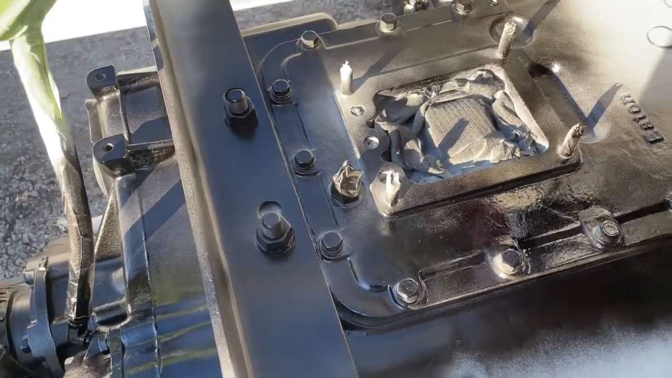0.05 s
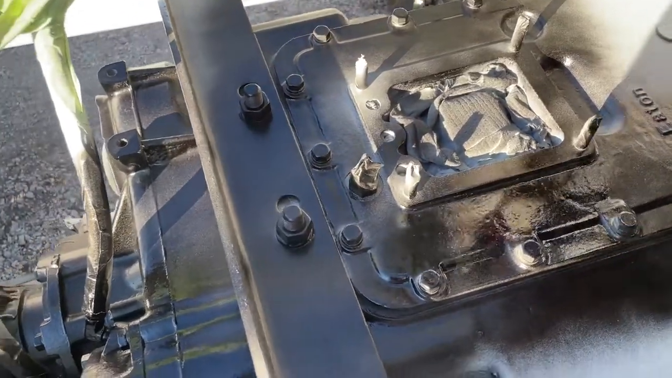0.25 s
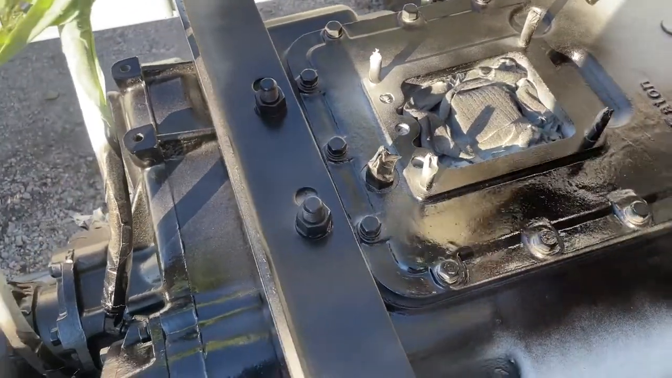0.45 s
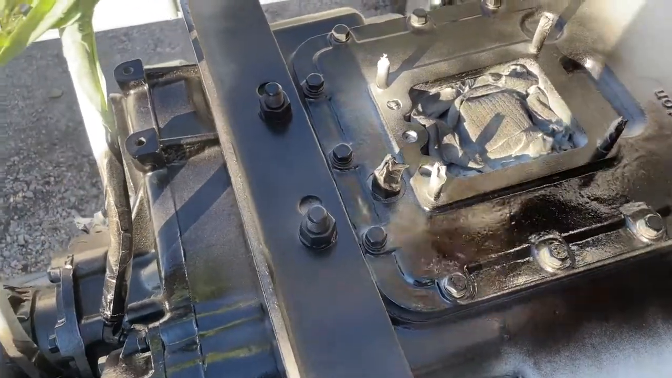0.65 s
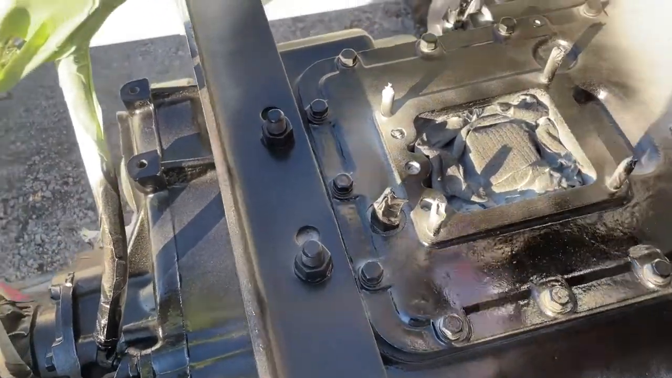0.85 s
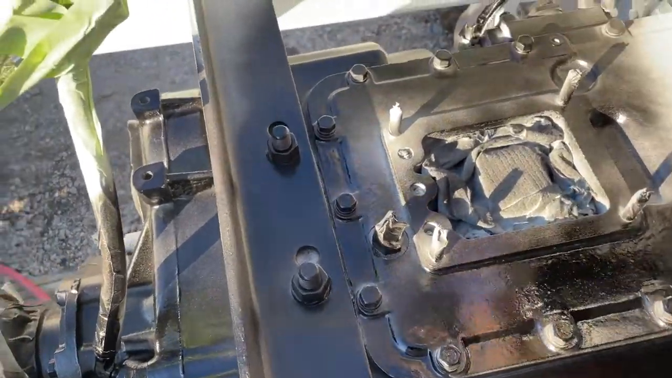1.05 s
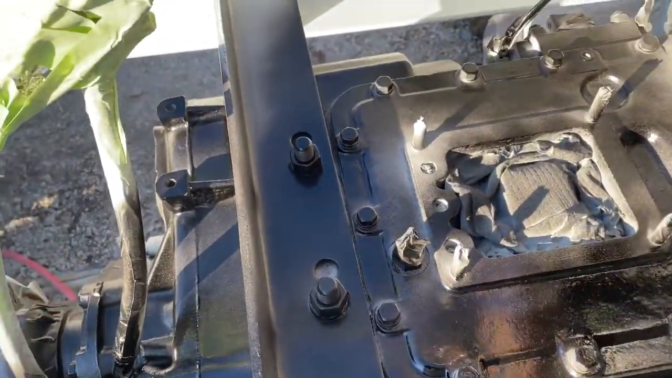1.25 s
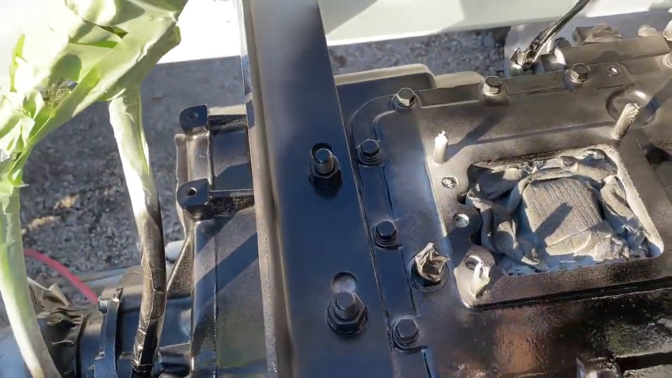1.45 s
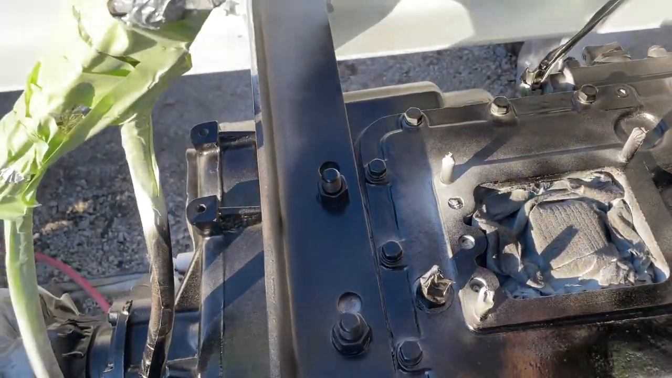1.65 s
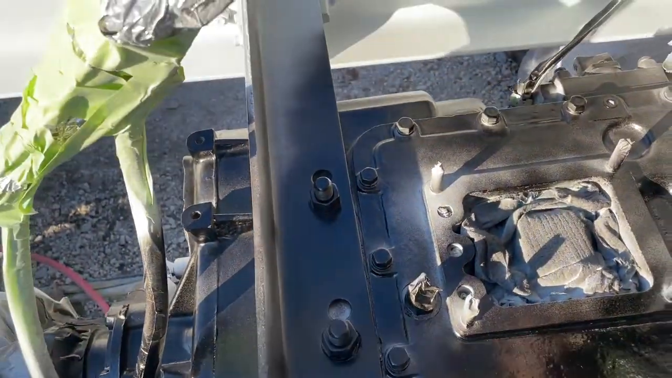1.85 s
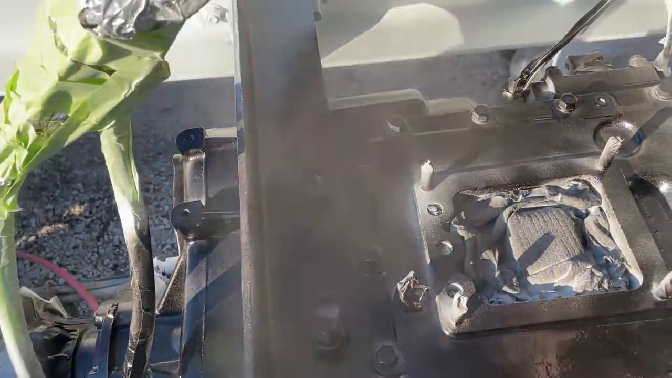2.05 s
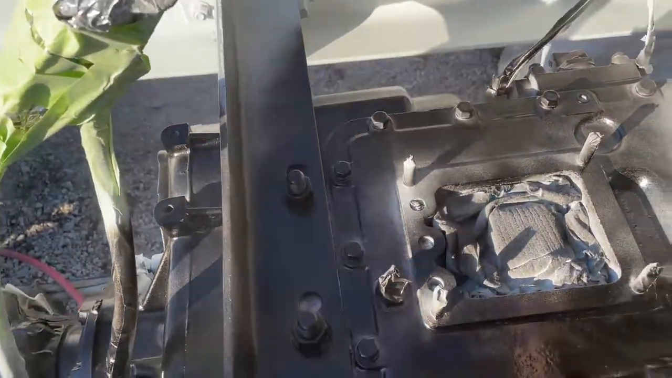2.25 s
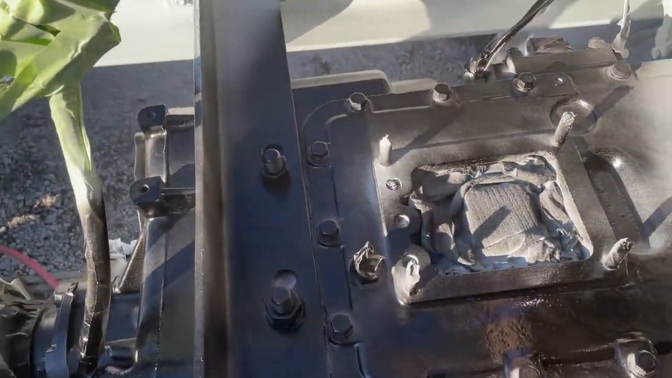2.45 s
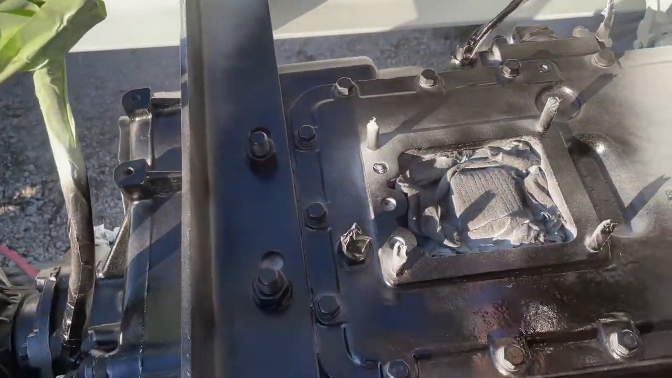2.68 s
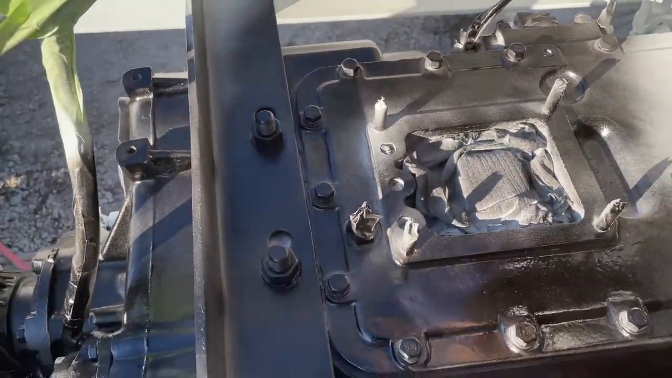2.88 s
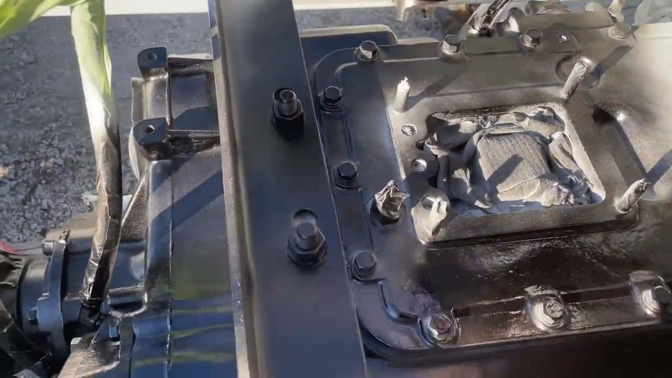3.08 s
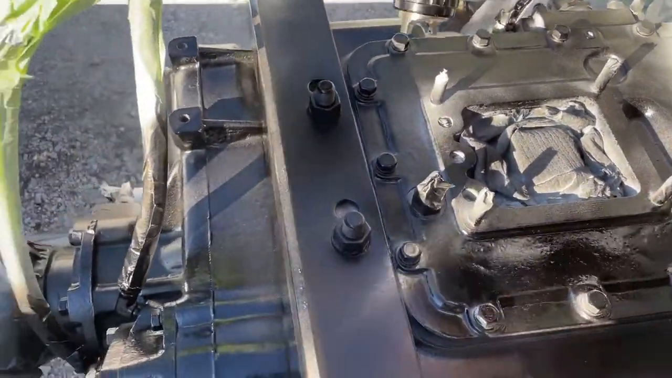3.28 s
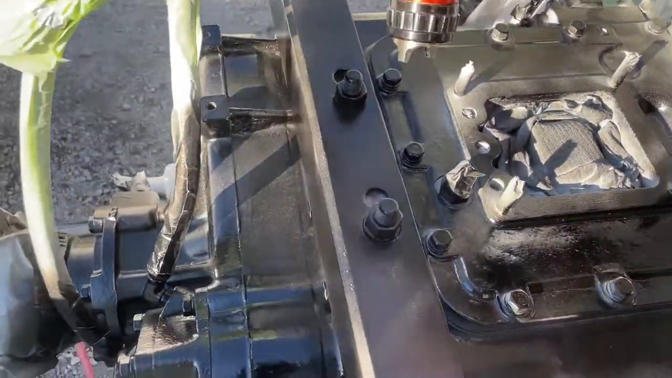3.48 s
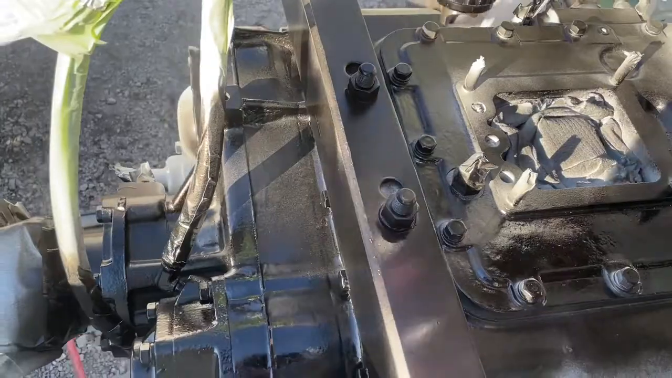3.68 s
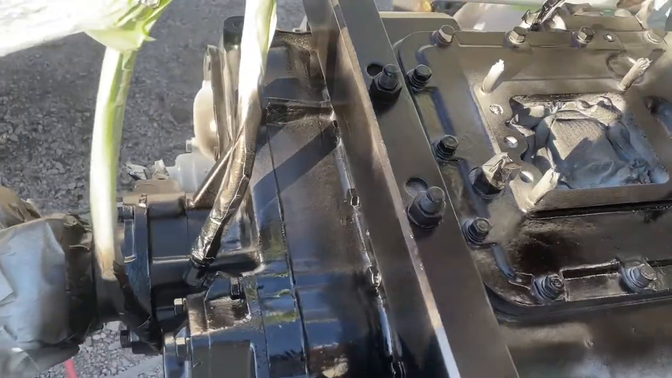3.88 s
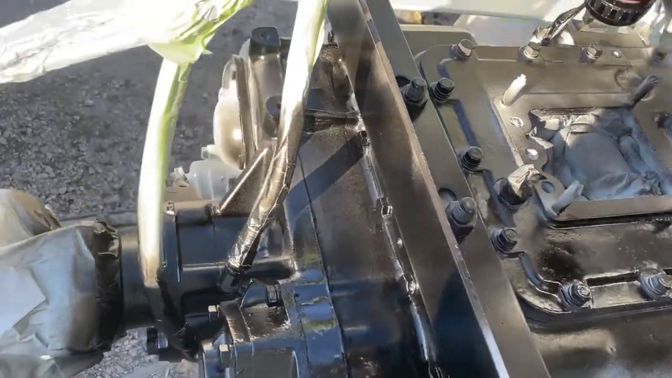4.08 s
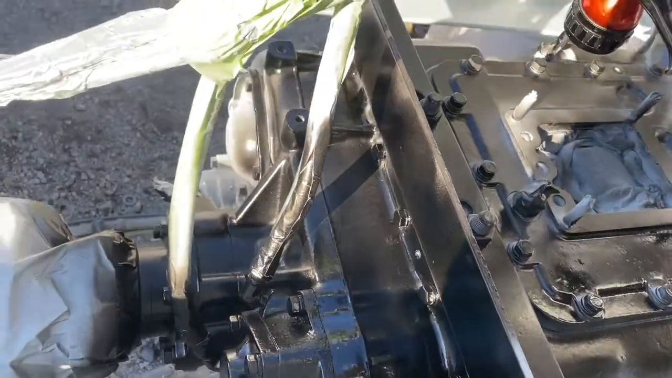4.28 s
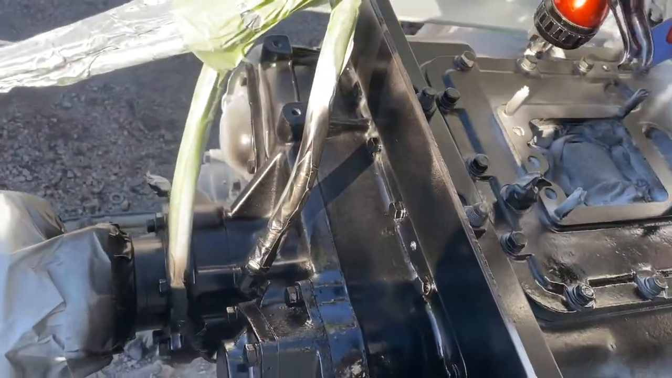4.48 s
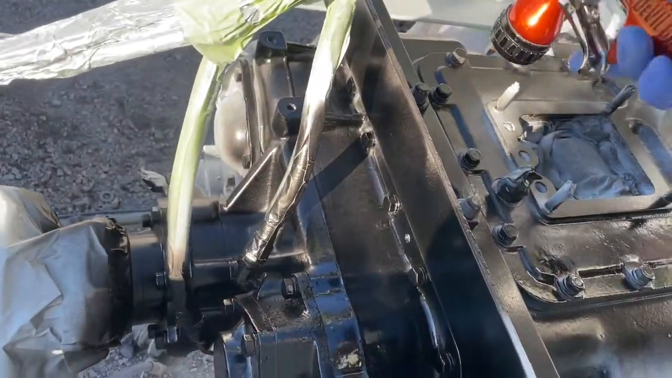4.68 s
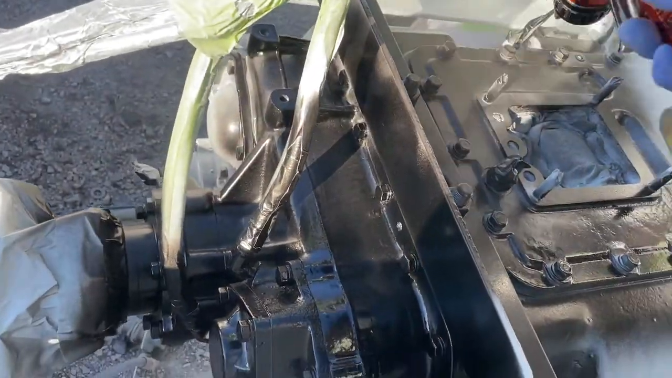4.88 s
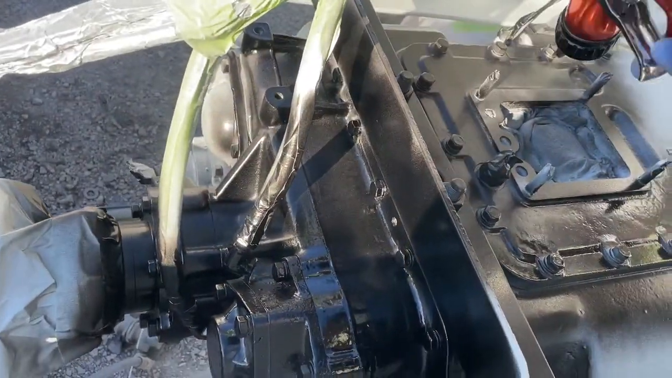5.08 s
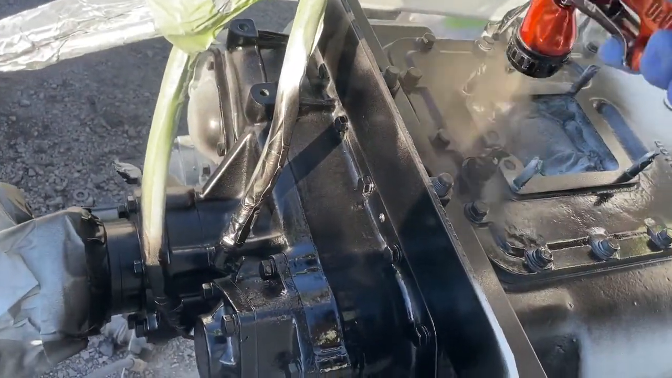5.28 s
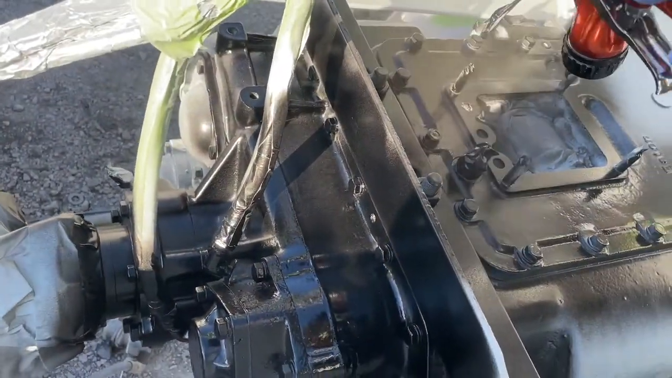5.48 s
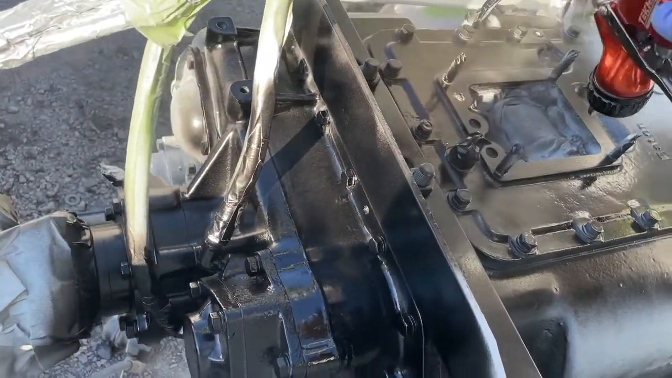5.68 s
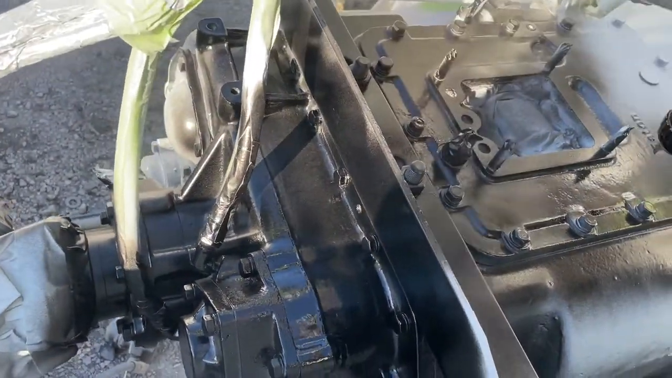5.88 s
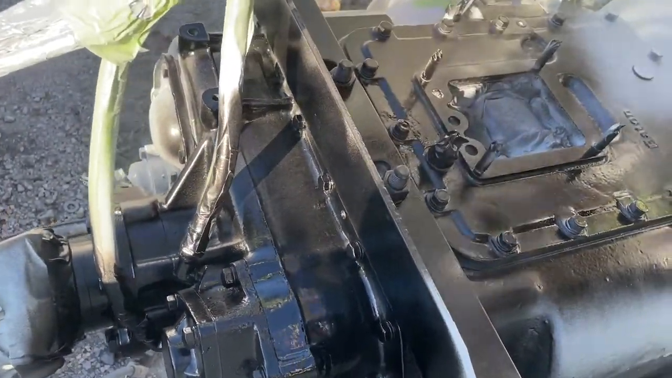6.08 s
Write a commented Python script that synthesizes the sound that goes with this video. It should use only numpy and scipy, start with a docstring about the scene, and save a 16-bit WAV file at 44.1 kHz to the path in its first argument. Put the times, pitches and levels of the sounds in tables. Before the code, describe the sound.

Outdoors in a yard, a quiet bed of low wind buffeting and rustling clothes carries a soft hollow rattle and small ticks. A trigger clicks and a sharp spray blast hisses, then stops dead. Handling bumps and taps follow, strongest midway. Two more, shorter blasts come close together near the end. The stereo microphone is handheld and close, with little echo.

```python
"""Spray gun in an open yard

A spray gun is triggered three times over a metal casting: shaped noise leaps up, surges, swells and cuts off.
Around the bursts, gusts and soft bumps are low noise and low waves; clothes and hose rustle as crackling noise.
Small parts tick as noise puffs, a hollow thing rattles as fading tones, and the yard murmurs and whistles far off.
Between the left and right channels the treble has a fixed turn of phase."""
import sys
import numpy as np
from scipy import signal
from scipy.fft import rfft, irfft, next_fast_len
from scipy.io import wavfile

SR = 44100
rng = np.random.default_rng(int(sys.argv[2]) if len(sys.argv) > 2 else 0)


def file_out(sig):
    """Save sig as 16-bit WAV at sys.argv[1]."""
    # one column per channel
    cols = np.atleast_2d(sig).T
    # limit, then scale
    lim = np.clip(cols, -1, 1)
    pcm = np.round(lim * 32767).astype(np.int16)
    wavfile.write(sys.argv[1], SR, pcm)


def amplitude_ratio(level_db):
    """Convert a level in decibels to the matching linear amplitude (field) ratio."""
    exponent = np.asarray(level_db, float) / 20
    return 10 ** exponent


N = 270774   # length in samples


def level_over_time(points):
    """A level drawn as straight lines between (t/s, level/dB) points, read at every sample."""
    seconds, level_db = np.transpose(points)
    return np.interp(np.arange(N) / SR, seconds, level_db)


def at_hz(points, hz, axis=1):
    """One column of a table read at any pitch, along a log pitch axis."""
    table = np.array(points)
    return np.interp(np.log(hz + 1), np.log(table[:, 0]), table[:, axis])


def drift(rate_hz, size):
    """Slow random wandering of spread 1: noise smoothed twice, made at every 20th sample and joined by lines."""
    r = np.exp(-40 * np.pi * rate_hz / SR)
    noise = rng.standard_normal(size // 20 + 4002)
    slow = signal.lfilter([1], [1, -2 * r, r * r], noise)[4000:]   # skip the filter's start
    return np.interp(np.arange(size) / 20, np.arange(len(slow)), slow / slow.std())


def stereo_white(size, close):
    """Spectra of left and right white noise; a shared and an opposed part set how alike they are by pitch."""
    # left-right likeness as heard, 1 = the same: f/Hz, for close sounds, for diffuse sounds;
    # the dips near 9 and 12.6 kHz are not a trait of the sources
    likeness = [(40, .85, .8), (250, .75, .65), (600, .5, .05), (1200, .85, .55), (2000, .75, .4),
                (2500, .995, .7), (3700, .7, .35), (4900, .995, .65), (6000, .6, .4), (6900, .97, .97),
                (7600, .97, .97), (9000, .84, .84), (10300, .99, .99), (11700, .99, .99), (12600, .8, .8),
                (13900, .995, .995), (16000, .995, .995)]
    hz = np.fft.rfftfreq(size, 1 / SR)
    alike = np.clip(at_hz(likeness, hz, axis=1 if close else 2), -1, 1)
    mid, side = rfft(rng.standard_normal((2, size)))
    shared = np.sqrt(1 + alike) * mid
    opposed = np.sqrt(1 - alike) * side * np.array([[1], [-1]])
    return hz, shared + opposed


def hiss(spectrum, close, patchy_db, rate_hz, size=N, push_db=0):
    """Noise coloured to rms 1, then split in overlapping half-octave bands that flicker and are pushed apart."""
    # how much of a push each pitch takes: f/Hz, share
    push_share = [(1000, 0.051), (4000, 0.16), (9000, 1), (15000, 0.92)]
    padded = next_fast_len(size)
    hz, white = stereo_white(padded, close)
    lowest_hz, highest_hz = spectrum[0][0], spectrum[-1][0]
    inside = (hz > lowest_hz) & (hz < highest_hz)
    shaped = white * amplitude_ratio(at_hz(spectrum, hz)) * inside
    shaped /= irfft(shaped).std()
    half_octaves = 2 * np.log2(hz + 1)
    out = 0
    for k in range(int(2 * np.log2(lowest_hz)), int(2 * np.log2(highest_hz)) + 2):
        weight = np.clip(1 - abs(half_octaves - k), 0, 1)
        band = irfft(shaped * weight, padded)[:, :size]
        flicker_db = patchy_db * drift(rate_hz, size)
        out = out + band * amplitude_ratio(flicker_db + push_db * at_hz(push_share, 2 ** (k / 2)))
    return out


def puff(size, centre_hz, octaves):
    """Friction noise around a centre pitch, scaled to rms 1."""
    hz, white = stereo_white(size, True)
    bell = np.exp(-2 * (np.log2((hz + 1) / centre_hz) / octaves) ** 2)
    out = irfft(white * bell)
    return out / out.std()


def spray():
    """The jet leaps up, surges while stored pressure drains, swells as the needle seats, and cuts off."""
    # trigger pulls: valve opens t/s, valve shuts t/s, steady jet level/dB, first surge/dB,
    # surge fade/s, swell before shutting/dB
    bursts = [(1.861, 2.117, -23, 8, .04, 4), (4.681, 4.883, -26, 9, 0.039, 0.5),
              (5.231, 5.415, -25, 8, 0.034, 4)]
    # nozzle aim at each pull: tilt about 8 kHz/dB per octave, ringing recess f/Hz, its boost/dB,
    # wash over the hollow casting level/dB, share of the pull at which the wash is fullest
    aims = [(0.5, 3000, 3, -37.5, 0.56), (-0.25, 2650, 5.5, -38.5, 0.32), (-0.18, 2470, 6, -37.5, .45)]
    # colour of the jet at the nozzle: f/Hz, relative level/dB per Hz
    jet_colour = [(110, -20.5), (250, -13.5), (500, -17.5), (1000, -15), (2000, -13.5), (4200, -9),
                  (5500, -5), (6900, 0.5), (8000, -3), (10500, -2), (12300, -4.5), (13800, -9.5),
                  (15300, -6.5), (15900, -3)]
    # colour of the wash over the casting: f/Hz, relative level/dB per Hz
    hollow_colour = [(600, -16.5), (1000, -4.5), (1500, 1.5), (1800, -4), (2300, -20.5)]
    open_db_per_s, shut_db_per_s, swell_s = 3507.5, 1695, 0.04
    # the yard answers briefly and dully after the valve shuts
    echo_db, echo_db_per_s, treble_dies_db_per_s = -38, 539, 149.5
    wash_fall_db = 28.5   # loss per squared share of the pull away from the fullest wash
    out = np.zeros((2, N))
    for burst, aim in zip(bursts, aims):
        opens, shuts, jet_db, surge_db, fade_s, swell_db = burst
        tilt, ring_hz, ring_db, wash_db, fullest = aim
        a, b = int((opens - 0.03) * SR), int((shuts + 0.12) * SR)
        t = np.arange(a, b) / SR
        after = np.maximum(t - shuts, 0)
        opening = amplitude_ratio(open_db_per_s * np.minimum(t - opens, 0))
        closing = amplitude_ratio(-shut_db_per_s * after)
        echo = amplitude_ratio(echo_db - echo_db_per_s * after)
        gate = opening * (closing + echo)
        surge = surge_db * np.exp(-(np.maximum(t - opens, 0) / fade_s) ** 3.8 / 2)
        swell = swell_db * np.exp(np.minimum(t - shuts, 0) / swell_s)
        push_db = surge + swell - treble_dies_db_per_s * after
        hz = np.geomspace(jet_colour[0][0], jet_colour[-1][0], 200)
        recess = ring_db * np.exp(-(np.log2(hz / ring_hz) / 0.29) ** 2)
        aimed = np.c_[hz, at_hz(jet_colour, hz) + tilt * np.log2(hz / 8000) + recess]
        sputter = amplitude_ratio(drift(300, b - a))   # droplets roughen the jet
        jet = amplitude_ratio(jet_db) * sputter * hiss(aimed, True, 0.73, 30, size=b - a, push_db=push_db)
        progress = (t - opens) / (shuts - opens)
        wash_level = amplitude_ratio(wash_db - wash_fall_db * (progress - fullest) ** 2)
        wash = wash_level * hiss(hollow_colour, True, 1.5, 60, size=b - a)
        out[:, a:b] += gate * (jet + wash)
    return out


def lever():
    """The trigger knocks the valve stem just before the first two bursts: three fading tones each time."""
    # lever strikes: t/s
    strikes = [1.829, 4.651]
    # ringing of the lever: f/Hz, level/dB, time to fall 60 dB/s
    modes = [(800, -41, 0.017), (3174, -52, 0.081), (8450, -54, 0.049)]
    out, t = np.zeros(N), np.arange(4410) / SR
    for s in strikes:
        for hz, level_db, t60 in modes:
            out[int(s * SR):][:len(t)] += amplitude_ratio(level_db - 60 * t / t60) * np.sin(2 * np.pi * hz * t)
    return out


def touches():
    """Ticks and taps: short puffs of friction noise with a quick rise and a smooth decay."""
    # ticks and taps: t/s, level at the top of the rise/dB, centre f/Hz, width/octaves, time to fall 60 dB/s
    taps = [(.038, -56.5, 3780, 0.92, 0.03), (.284, -61.5, 1960, 0.071, 0.078), (.282, -58, 900, 1.3, 0.13),
            (.322, -63, 1450, .3, .05), (0.649, -55, 2580, 0.82, 0.02), (1.283, -38, 4360, 5, 0.028),
            (1.29, -48, 770, 0.57, 0.042), (1.829, -46.5, 3000, 2.1, 0.034),
            (2.592, -50.5, 1348, 0.62, 0.035), (2.961, -52.5, 4960, 3.4, 0.032),
            (2.962, -58.5, 496, 0.46, 0.044), (3.098, -50, 1490, 0.98, 0.02), (3.208, -58, 1800, 1.5, 0.02),
            (3.265, -54.5, 8000, 3, .03), (3.432, -45.5, 2500, 2.6, 0.045), (3.434, -38, 1370, 0.34, 0.037),
            (3.446, -44, 1500, 1.6, 0.03), (3.476, -52, 1470, .3, .04), (3.49, -47, 3200, 2.6, 0.014),
            (3.549, -48, 1500, .6, .025), (3.577, -51, 1470, .4, 0.044), (4.093, -49, 1080, 0.47, 0.037),
            (4.43, -54, 1200, .5, 0.027), (4.462, -50.5, 1064, 0.53, 0.065), (4.651, -44, 2990, 2.7, 0.025),
            (4.907, -46, 1490, 1.1, 0.024), (4.973, -49, 1800, 1.2, 0.014), (4.988, -56, 3000, 1.5, 0.018),
            (5.053, -50.5, 1170, 0.46, 0.037), (5.086, -56, 2200, 2, 0.017), (5.1, -55.5, 6000, 2.5, 0.013),
            (5.13, -53.5, 7000, 2.5, 0.014), (5.527, -52.5, 2770, 1, .02), (5.536, -46, 1920, 1.5, 0.02),
            (5.63, -59, 4600, 1.6, 0.062), (5.765, -55, 600, 0.85, 0.044), (5.776, -59, 1835, 0.14, 0.076)]
    size = 16384
    out = np.zeros((2, N + size))
    t = np.arange(size) / SR
    for s, peak_db, centre_hz, octaves, t60 in taps:
        rise_s = 0.039 * t60
        decay = amplitude_ratio(-60 * (np.maximum(t - rise_s, 0) / t60) ** 1.27)
        shape = np.minimum(t / rise_s, 1) * decay
        shape *= amplitude_ratio(1.5 * drift(90, size))   # slightly uneven
        at = int(s * SR)
        out[:, at:at + size] += amplitude_ratio(peak_db) * shape * puff(size, centre_hz, octaves)
    return out[:, :N]


def scuffs():
    """Friction noise held for the length of a move; stick and slip add short grains."""
    # held scuffs of cloth and hose: from t/s, to t/s, level/dB, centre f/Hz, width/octaves
    moves = [(.145, 0.229, -56.5, 700, 1.9), (3.03, 3.27, -65, 2900, 1.8), (3.519, 3.579, -60, 2700, 1.38),
             (4.941, 4.99, -61, 2250, 1.0), (5.009, 5.14, -66.5, 2000, 1.3),
             (5.469, 5.51, -56.5, 2200, 1.6)]
    rise_s, fall_db_per_s, grains_per_s, grain_size = 0.015, 602, 120, 0.84
    size = 16384
    out = np.zeros((2, N + size))
    t = np.arange(size) / SR
    for start, end, level_db, centre_hz, octaves in moves:
        fall_db = fall_db_per_s * np.maximum(t - (end - start), 0)
        held = np.minimum(t / rise_s, 1) * amplitude_ratio(level_db - fall_db)
        slips = (rng.random(size) < grains_per_s / SR) * rng.exponential(1, size) * grain_size
        grains = signal.lfilter([1], [1, -np.exp(-400 / SR)], slips + 1e-18)   # each dies in a few ms
        uneven = amplitude_ratio(2 * drift(40, size)) + grains
        at = int(start * SR)
        out[:, at:at + size] += held * uneven * puff(size, centre_hz, octaves)
    return out[:, :N]


def rattle():
    """Something hollow rattles: each soft knock strikes every mode with a strength and tuning of its own."""
    # knocks: t/s, base level/dB
    knocks = [(.150, -56), (.162, -54), (.171, -49), (.180, -48), (.195, -51), (.220, -46), (.232, -59)]
    # what it rings with: f/Hz, level against the knock/dB, time to fall 60 dB/s
    modes = [(330, -2, 0.071), (450, 1, 0.063), (579, 1, .06), (1010, -8, .04), (1500, -7, .04)]
    out, t = np.zeros(N), np.arange(4410) / SR
    rise = np.minimum(t / 0.0018, 1)
    chances = rng.standard_normal((len(knocks), len(modes)))
    for (s, knock_db), chance in zip(knocks, chances):
        for (hz, level_db, t60), c in zip(modes, chance):
            fading = amplitude_ratio(knock_db + level_db + 2 * c - 60 * t / t60)
            tone = np.sin(2 * np.pi * hz * (1 + 0.03 * c) * t) * np.sign(c)
            out[int(s * SR):][:len(t)] += rise * fading * tone
    return out


def thumps():
    """Each bump is a soft push: a few low cycles whose higher partials come first and die sooner."""
    # strongest eddies or bumps of the hand: middle t/s, level before the partials' shares/dB, base f/Hz, length/s
    bumps = [(0.599, -49.5, 103.5, 0.058), (0.699, -41.5, 115, 0.091), (0.765, -39, 91.5, 0.022),
             (0.845, -39.5, 147, 0.025), (1.575, -48.5, 90, 0.043), (1.884, -37, 189, 0.028),
             (2.336, -46, 88, 0.062), (2.376, -35.5, 83.6, 0.027), (2.903, -42, 63.4, 0.028),
             (3.291, -46.5, 93.5, 0.066), (3.428, -26.5, 144, 0.023), (3.451, -31.5, 90, .025),
             (3.502, -34, 102.4, 0.054), (3.618, -36, 70.5, 0.085), (3.74, -41, 118.4, 0.062),
             (3.802, -37.5, 111.3, 0.085), (3.882, -42, 84, 0.13), (4.106, -34.5, 104.6, 0.024),
             (4.211, -37, 79, 0.028), (4.374, -37, 75.7, 0.038), (4.422, -38.5, 87.5, 0.089),
             (4.494, -35.5, 104, 0.022), (4.611, -47.5, 71.6, 0.033), (5.425, -38.5, 119, 0.017),
             (6.026, -40.5, 82, 0.037)]
    # partials of a bump: pitch ratio, share, relative length
    partials = [(.7, 0.46, 1.19), (1.15, 0.59, 0.85), (2.1, 0.36, 0.54), (3.3, 0.11, 0.32)]
    size = 16384
    out = np.zeros((2, N + size))
    t = np.arange(-size // 2, size // 2) / SR
    turns = rng.uniform(0, 2 * np.pi, (len(bumps), 8))   # random starting phases
    for (s, peak_db, hz, length), turn in zip(bumps, turns):
        wander = drift(12, size)   # the pitch is unsteady
        at = int(s * SR)
        for k, (ratio, share, short) in enumerate(partials):
            sides = 0.5 * np.cos(turn[k + 4]) * np.array([[1], [-1]])   # left and right differ in phase
            late = t + 0.32 * length * (1 - short)
            spread = short * length * np.where(late < 0, 0.35, 0.5)   # quicker to come than to go
            phase = 2 * np.pi * ratio * hz * t + turn[k] + sides + ratio * wander
            wave = np.sin(phase) * np.exp(-(late / spread) ** 2 / 2)
            out[:, at:at + size] += amplitude_ratio(peak_db) * share * wave
    return out[:, size // 2:N + size // 2]


def wind():
    """Eddies press on the microphone ports in lumps: low noise whose level follows the gusts and wanders."""
    # wind on the ports, before its wandering: t/s, level/dB
    gusts = [(0, -64), (.45, -62), (.95, -57.5), (1.15, -76), (1.35, -63.5), (2.0, -58.5), (2.3, -66.5),
             (2.85, -68), (3.35, -54.5), (3.46, -42.5), (3.7, -52.5), (4.04, -64), (4.17, -55.5),
             (4.5, -58.5), (5.1, -62.5), (5.35, -52.5), (5.5, -66.5), (5.88, -65), (6.14, -55.5)]
    # colour of the buffeting: f/Hz, relative level/dB per Hz
    buffet = [(20, -22), (35, -9.5), (55, 1), (90, 1.5), (130, -4.5), (220, -9), (350, -18), (600, -39.5)]
    gust_db = level_over_time(gusts) + 4.45 * drift(12, N)
    return amplitude_ratio(gust_db) * hiss(buffet, False, 3.7, 8)


def rustle():
    """Moving clothes and hose: noise that crackles in all its bands at once, with stray ticks of cloth."""
    # clothes and hose on the move: t/s, rustle level before the crackle/dB
    moving = [(0, -67), (.6, -64), (.68, -58.5), (.76, -66), (.87, -61.5), (1.1, -68), (1.32, -66.5),
              (1.6, -73.5), (3.0, -69), (3.04, -61.5), (3.26, -58), (3.32, -67.5), (3.58, -60),
              (3.8, -57.5), (4.05, -64.5), (4.2, -63), (4.64, -67), (5.1, -66), (5.2, -68.5), (5.65, -63.5),
              (5.74, -70), (6.14, -66)]
    # colour of the rustle: f/Hz, relative level/dB per Hz
    cloth = [(700, -6), (1000, 3), (1550, 8), (1900, -1), (3000, 0), (6000, -3.5), (8000, -6)]
    # colour of its airy top: f/Hz, relative level/dB per Hz
    airy_top = [(5000, -14.5), (7000, 1.5), (10000, -3), (12500, -6.5), (14000, -13.5), (15900, -19)]
    # the airy top's level at a brisk rustle; it swings more than the rustle does
    airy_brisk_db, airy_follows, brisk_db = -61, 1.5, -60.5
    rustle_db = level_over_time(moving)
    airy_db = airy_brisk_db + airy_follows * (rustle_db - brisk_db)
    strokes = (rng.random(N) < 30 / SR) * rng.uniform(0, 1.2, N)   # about 30 a second
    ticks = signal.lfilter([1], [1, -np.exp(-300 / SR)], strokes + 1e-18)
    crackle = amplitude_ratio(1.2 * drift(25, N) + 1.8 * drift(250, N)) + ticks
    body = amplitude_ratio(rustle_db) * hiss(cloth, False, 1.3, 21)
    airy = amplitude_ratio(airy_db) * hiss(airy_top, False, 0.64, 12)
    return crackle * (body + airy)


def yard():
    """The far murmur of the yard: mostly low and middle noise that comes and goes."""
    # yard murmur: t/s, level/dB
    murmur = [(0, -66), (1.0, -67), (1.12, -64), (1.4, -60), (1.82, -61.5), (2.17, -67.5), (2.95, -67.5),
              (3.1, -64), (3.47, -53.5), (3.62, -61.5), (3.8, -59), (4.0, -69), (4.2, -65), (5.2, -64),
              (5.5, -60), (6.14, -69)]
    # colour of the murmur: f/Hz, relative level/dB per Hz
    colour = [(150, -5.5), (300, 2), (500, 1.5), (700, 1.5), (1000, -4.5), (1600, -15.5), (2400, -19.5)]
    return amplitude_ratio(level_over_time(murmur)) * hiss(colour, False, 1.3, 13)


def whistles():
    """Faint far drones and whistles: narrow bands of diffuse noise, fading in and out."""
    # drones and whistles: centre f/Hz, width/Hz, level/dB
    drones = [(690, 90, -69), (1000, 90, -73.5), (2490, 120, -81.5)]
    start_s, end_s, fade_s = 1.1, 1.84, 0.067
    t, size = np.arange(N) / SR, next_fast_len(N)
    hz, white = stereo_white(size, False)
    out = 0
    for centre_hz, width_hz, level_db in drones:
        peak = 1 / (1 + ((hz - centre_hz) / width_hz * 2) ** 2)
        band = irfft(white * peak, size)[:, :N]
        out = out + amplitude_ratio(level_db) * band / band.std()
    fade = np.clip(np.minimum(t - start_s, end_s - t) / fade_s, 0, 1)
    return fade * out


def scene():
    """All sources added up, left and right."""
    gun = spray() + lever()
    handling = touches() + scuffs() + rattle() + thumps()
    background = wind() + rustle() + yard() + whistles()
    return gun + handling + background


def band_limit(x):
    """A steep low-pass at the top of the band."""
    return signal.sosfilt(signal.butter(12, 17140, fs=SR, output="sos"), x)


def record(dry):
    """The left and right channels differ in phase and level by pitch, half on each side; the top is cut."""
    # left channel against the right, as heard: f/Hz, phase ahead/radians, level/dB;
    # the phase is nearly flat from 10.4 to 11.6 kHz
    left_against_right = [(0, 0, 0), (1000, -.2, .5), (1600, -1.1, 4), (2100, 0, .1), (5600, 0, .3),
                          (6800, -2.9, .3), (7500, -3.25, .1), (10400, -6.15, .1), (11600, -6.4, 0),
                          (13900, -9.35, 0), (15000, -9.45, 0), (15300, -9.95, 0)]
    cutoff_hz = 15950
    size = next_fast_len(N + 2048)
    hz = np.fft.rfftfreq(size, 1 / SR)
    table_hz, ahead, louder_db = np.transpose(left_against_right)
    half_turn = np.exp(0.5j * np.interp(hz, table_hz, ahead))
    half = half_turn * amplitude_ratio(np.interp(hz, table_hz, louder_db) / 2)
    spectra = rfft(dry, size) * [half, 1 / half] * (hz < cutoff_hz)
    mix = irfft(spectra, size)[:, :N]
    return band_limit(mix)


dry = scene()
out = record(dry)
file_out(out)
```